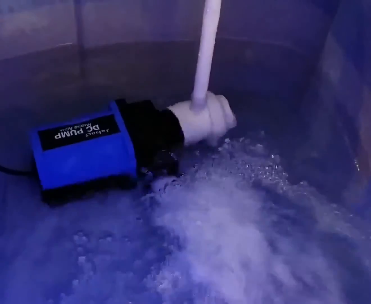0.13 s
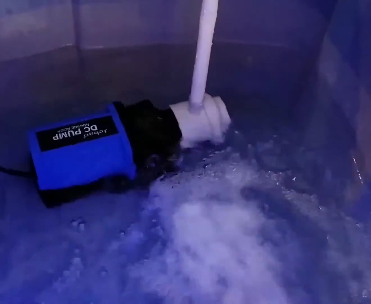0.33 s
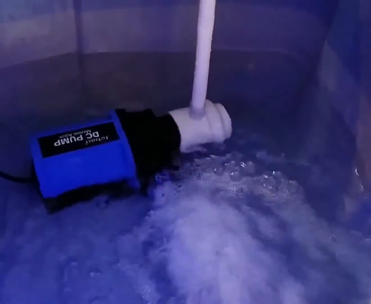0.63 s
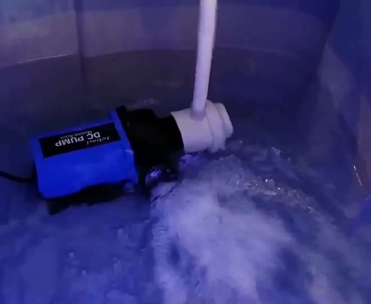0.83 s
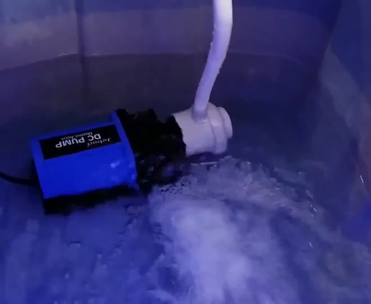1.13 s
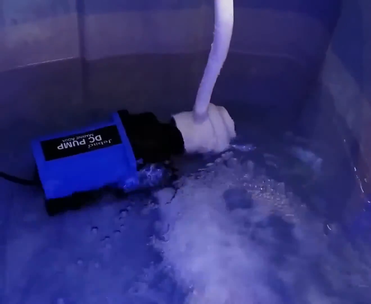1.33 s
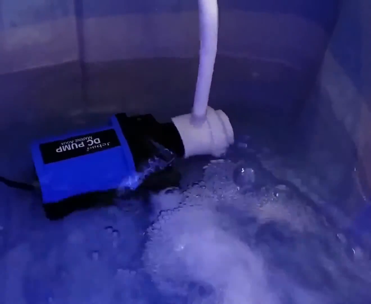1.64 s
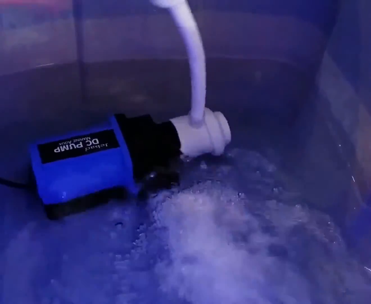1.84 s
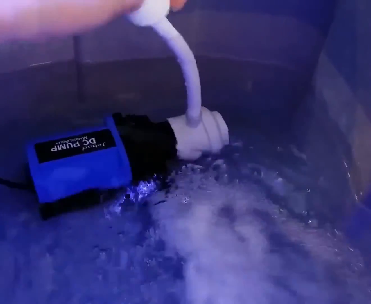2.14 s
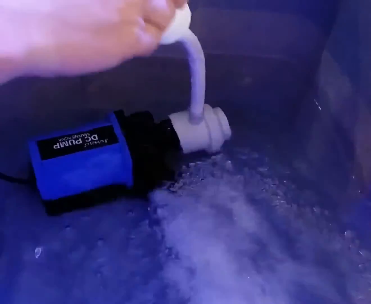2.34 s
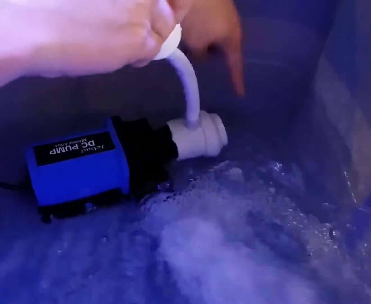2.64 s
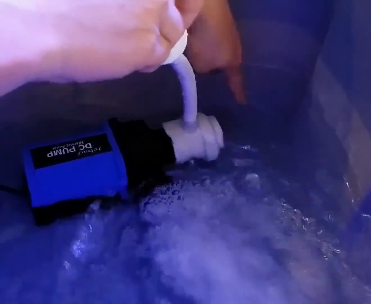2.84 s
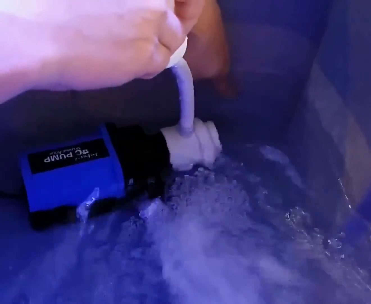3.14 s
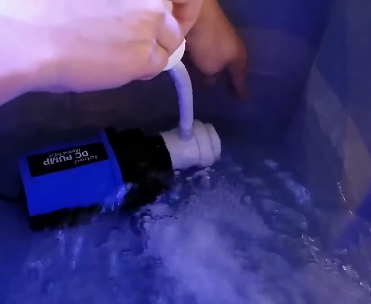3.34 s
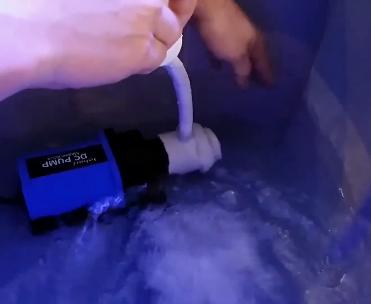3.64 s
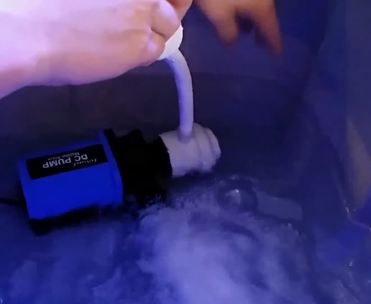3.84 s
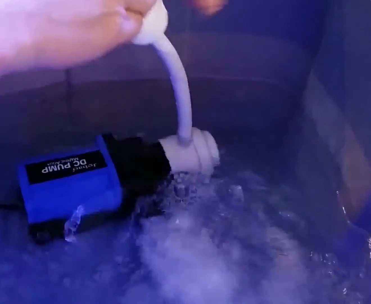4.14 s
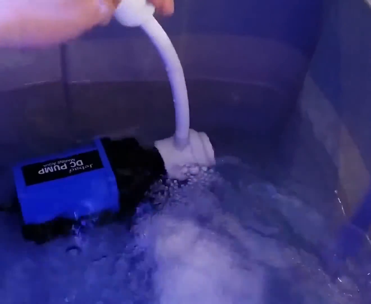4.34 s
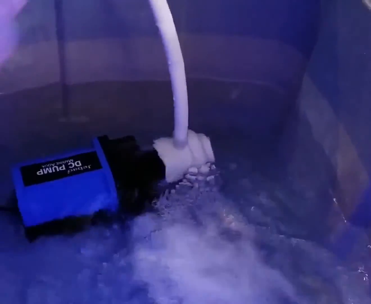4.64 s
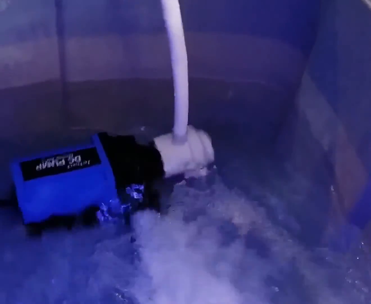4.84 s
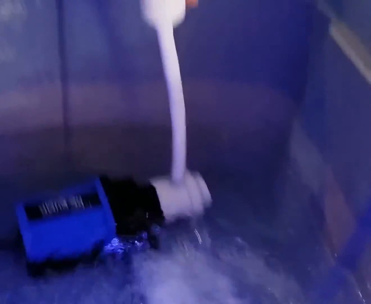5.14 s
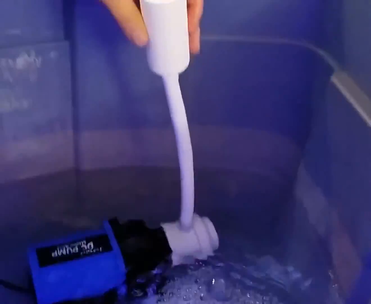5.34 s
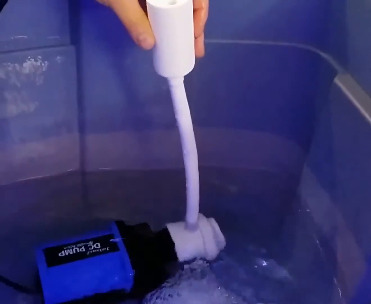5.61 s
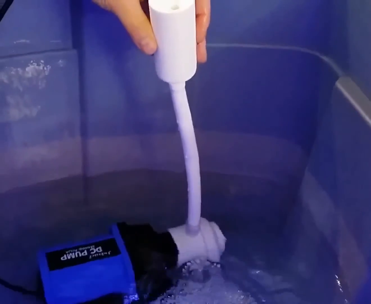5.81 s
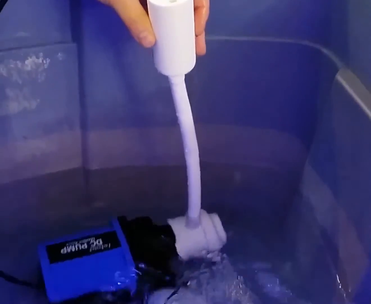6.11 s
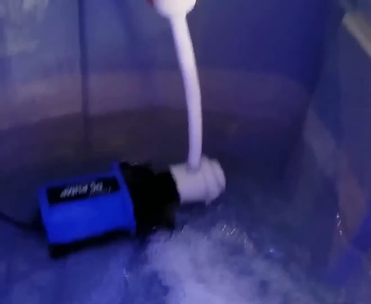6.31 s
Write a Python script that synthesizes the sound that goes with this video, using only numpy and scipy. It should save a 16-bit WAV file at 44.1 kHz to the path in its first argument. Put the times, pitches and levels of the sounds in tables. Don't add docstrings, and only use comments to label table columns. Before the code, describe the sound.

Close above a plastic tub, a submerged pump beats air into water: a steady low boom, soft foam fizz and a faint breathy whistle. For nearly two seconds water spits up the air hose in bright, hollow ticks. It then calms to small snaps and lone bubble blips until the sputtering returns around 4.6 seconds, ending in deeper, wetter glugs.

```python
import sys
import numpy as np
from scipy import signal
from scipy.fft import rfft, irfft
from scipy.io import wavfile
from scipy.ndimage import uniform_filter1d

SR = 44100
rng = np.random.default_rng(int(sys.argv[2]) if len(sys.argv) > 2 else 0)


def linear_from_db(decibels):
    return 10 ** (np.asarray(decibels, float) / 20)


def pcm_store(signal):
    levels = np.round(np.clip(np.atleast_2d(signal), -1, 1) * 32767)
    wavfile.write(sys.argv[1], SR, levels.astype(np.int16).T)


N = 285229

# start t/s, length/s, spray level/dB, depth of its air pockets/dB
GULP_TIMES = [(-.002, 0.051, -31, -9), (0.066, 0.073, -36.5, -8), (0.175, 0.1, -41.5, 1.5),
              (0.283, 0.078, -33, -6.5), (0.418, 0.04, -30, -7), (0.558, 0.13, -37, -4),
              (0.773, 0.064, -35.5, -8), (0.99, 0.031, -32, -9), (1.15, 0.12, -35.5, -10),
              (1.26, 0.023, -29.5, -4.5), (1.323, 0.038, -34.5, 1.5), (1.358, 0.17, -32, -7.5),
              (1.714, 0.017, -32.5, -10), (1.743, 0.0092, -25, -17), (1.767, 0.035, -25, -6.5),
              (1.865, 0.01, -29.5, -3.5), (3.599, 0.045, -35.5, -6), (4.585, 0.054, -33.5, -2),
              (4.783, 0.034, -26, -7), (4.86, 0.024, -29.5, -12.5), (4.921, 0.029, -29, -3.5),
              (5.059, 0.046, -40.5, -11), (5.1, 0.14, -27.5, -6), (5.247, 0.21, -40, 1.5),
              (5.723, 0.08, -36.5, -1.5), (5.923, 0.019, -44, 4.5), (6.04, 0.11, -29, -0.5),
              (6.186, 0.079, -31.5, -0.5), (6.264, 0.055, -28, 0.5), (6.336, 0.11, -37, -1)]
LEFT_LAG = 18
SECOND_MODE = 1.93


def evened(x):
    return x / np.sqrt(np.mean(x ** 2) + 1e-20)


def curve(rows, axis):
    rows = np.array(rows)
    return np.interp(np.arange(N) / SR, rows[:, 0], rows[:, axis])


def read(points, hz):
    f, value = np.transpose(points)
    return np.interp(np.log(hz + 1), np.log(f + 1), value)


def lowpass(x, taps, hz):
    return signal.oaconvolve(x, signal.firwin(taps, hz, fs=SR)[None], "same")


def bandpass(x, low_hz, high_hz):
    return signal.sosfilt(signal.butter(2, [low_hz, high_hz], "band", fs=SR, output="sos"), x)


def both_ports(x):
    return np.array([np.roll(x, LEFT_LAG), x])


def ring(t, hz, t60, rise=0.00024):
    return np.sin(2 * np.pi * hz * t) * (1 - np.exp(-t / rise)) * linear_from_db(-60 * t / t60)


def narrow_noise(hz, width_hz):
    real, imaginary = rng.standard_normal((2, len(hz)))
    wobble_filter = signal.butter(2, width_hz / 2, fs=SR, output="sos")
    wobble = signal.sosfilt(wobble_filter, real + 1j * imaginary)
    return evened((wobble * np.exp(2j * np.pi * np.cumsum(hz) / SR)).real)


def noise(colour, size, patchy_db, flicker_db):
    # f/Hz, likeness (0 to 1)
    likeness = [(30, .9), (60, .97), (130, .995), (290, .99), (640, .76), (1410, .35), (3100, .05),
                (15000, 0)]
    frames, hz = 4 * N // size + 5, np.fft.rfftfreq(size, 1 / SR)
    a, b, c, d, patches = rng.standard_normal((frames, len(hz), 5)).T
    patches = uniform_filter1d(patches, size=4, axis=0)
    patches = evened(uniform_filter1d(patches, size=6, axis=1))
    flicker = evened(uniform_filter1d(rng.standard_normal(frames), size=3))
    same = np.clip(read(likeness, hz), -1, 1)[:, None]
    left = a + 1j * b
    right = same * left + np.sqrt(1 - same ** 2) * (c + 1j * d)
    level_db = colour(hz)[:, None] + patchy_db * patches + flicker_db * flicker
    spectra = np.array([left, right]) * linear_from_db(level_db)
    return evened(signal.istft(spectra, nperseg=size, noverlap=3 * size // 4)[1][:, :N])


def sputters():
    rows, t, out = breaks(), np.arange(700) / SR, np.zeros((2, N + 800))
    cracks = rng.standard_normal((len(rows), 3, len(t)))
    cracks = cracks[:, :2] + 0.22 * cracks[:, 2:]
    bright = bandpass(cracks, 4900, 9300)
    broad = bandpass(cracks, 1600, 5500)
    crack_shape = (1 - np.exp(-t / 0.00049)) * linear_from_db(-60 * t / 0.0026)
    for (s, db, low_hz, low_db, high_hz, crack_db), top, body in zip(rows, bright, broad):
        low_ring = linear_from_db(low_db - 1.5) * ring(t, low_hz, 0.011, rise=0.00036)
        high_ring = 0.81 * ring(t, high_hz, 0.0067)
        crack = (linear_from_db(crack_db + 23) * top + 0.5 * body) * crack_shape
        tick = low_ring + high_ring + crack
        for side, lag in enumerate((LEFT_LAG, 0)):
            at = round(s * SR) + lag
            out[side, at:at + len(t)] += linear_from_db(db + 5) * tick[side]
    return out[:, :N]


def breaks():
    # t/s, peak level/dB, ring f/Hz, crack share/dB
    slugs = [(0.0663, -13.5, 5440, -10), (.267, -20, 8100, -4), (0.301, -15.5, 4260, -5.5),
             (.4238, -21.5, 5400, -19), (.441, -20, 6050, -8.5), (0.4545, -15.5, 4000, -28),
             (.612, -16.5, 3370, -18), (0.6274, -24, 4900, -14), (0.9926, -19.5, 5130, -15),
             (1.0137, -17, 4140, -21), (1.1558, -23, 3480, -4.5), (1.1672, -7.5, 4320, -19),
             (1.2035, -14, 3900, -12.5), (1.263, -9, 3580, -19), (1.378, -13, 8000, -9),
             (1.7424, -10, 3540, -13), (1.7753, -12.5, 3450, -10.5), (1.8554, -12, 3530, -23),
             (2.176, -25, 5020, -4.5), (3.689, -16.5, 7700, -23), (4.591, -21.5, 4400, -2),
             (4.783, -24, 5100, -2), (4.856, -12.5, 4300, -11), (4.866, -12.5, 4200, -20),
             (4.927, -14, 4130, -18), (5.119, -12, 3850, -11), (5.1445, -16.5, 3830, -6),
             (5.1898, -10.5, 6480, -13.5), (6.038, -19, 5030, -13), (6.2654, -14, 4170, -4)]
    # t/s, peak level/dB, pocket f/Hz, second ring/dB
    glugs = [(0.067, -24, 2930, -20), (0.559, -29, 2200, 3), (0.585, -22, 2320, -18),
             (1.1558, -10, 3330, -5), (1.3137, -22, 1740, 3), (1.3642, -17, 3170, -7),
             (1.378, -21, 3210, -10), (4.283, -22, 1880, -3), (4.637, -23, 2540, -16),
             (4.783, -22.5, 2610, -5), (4.865, -21, 1790, -18), (4.9283, -22, 2760, -1),
             (5.0634, -21, 2950, -5), (5.089, -18.5, 2630, 1.5), (5.1057, -21.5, 2300, -2),
             (5.189, -19, 2260, -13), (5.2095, -16.5, 3080, -1), (5.309, -33, 2200, -7),
             (5.9304, -19.5, 2640, -16), (6.049, -20.5, 2030, 8), (6.0651, -11, 1940, -0.5),
             (6.1024, -17.5, 1900, 6), (6.127, -18.5, 1940, 7.5), (6.1839, -19.5, 2080, 13),
             (6.2289, -17.5, 2010, 7.5), (6.247, -16, 1860, 3), (6.278, -17, 2360, -4),
             (6.3159, -8.5, 1740, -6), (6.341, -18, 1740, -11), (6.39, -20, 1810, 3)]
    # t/s, peak level/dB, f/Hz
    drips = [(0.0609, -35, 2620), (0.2721, -27, 2070), (0.2996, -23, 2620), (0.3051, -25, 2330),
             (0.6262, -24, 2430), (1.1834, -21, 3240), (1.2063, -34, 2240), (1.2622, -28, 3300),
             (1.3445, -21, 2560), (1.3561, -21, 1930), (1.3888, -30, 3190), (1.4244, -38, 3190),
             (1.7433, -24.0, 3280), (1.7487, -22, 2600), (1.7538, -34, 3270), (1.7748, -21.7, 3270),
             (1.7835, -31, 3300), (1.7962, -26, 2240), (1.8035, -31, 3300), (1.8546, -30, 3220),
             (1.8655, -34, 3250), (4.8072, -28, 2330), (4.8126, -28.2, 2220), (4.8558, -23.5, 1985),
             (4.936, -22, 2720), (5.0702, -22, 2580), (5.0924, -23, 2600), (5.1112, -34, 2430),
             (5.1181, -21.8, 2240), (5.1239, -22.0, 2400), (5.1297, -23, 2300), (5.1359, -23, 2400),
             (5.1446, -25, 2180), (5.1501, -30, 2130), (5.1562, -22, 2300), (5.1682, -21, 2240),
             (5.1816, -19, 2250), (5.2038, -20, 2370), (5.2132, -20, 2070), (5.219, -33, 2240),
             (5.2237, -28.2, 2150), (5.2375, -29.3, 2420), (5.3133, -29.3, 2330), (6.0379, -27, 2820),
             (6.0426, -24, 2320), (6.0992, -17, 1810), (6.1162, -17, 1810), (6.1398, -35, 2150),
             (6.1721, -25, 2150), (6.1884, -17.5, 2290), (6.1997, -20, 2410), (6.2146, -22, 2350),
             (6.2396, -26.8, 2280), (6.2646, -26.5, 2170), (6.2708, -21, 2220), (6.2839, -15.5, 1810),
             (6.3024, -22, 2780), (6.3071, -19, 2580), (6.3248, -33, 2330), (6.3782, -25, 1810)]
    # t/s, peak level/dB, f/Hz
    spits = [(0.0007, -23, 4420), (0.0177, -30.8, 4200), (0.124, -34, 3360), (0.3044, -32, 4310),
             (0.3116, -33, 4050), (0.468, -35, 6460), (0.6421, -23, 4800), (0.8137, -26, 4330),
             (0.8685, -24, 3940), (1.1537, -22, 4390), (1.1827, -16, 4220), (1.1907, -19, 4250),
             (1.2117, -26, 5600), (1.276, -28, 3550), (1.3159, -33, 3340), (1.3634, -22, 5080),
             (1.3892, -32, 3360), (1.4022, -36, 3940), (1.4244, -23, 3360), (1.72, -38, 5770),
             (1.7338, -20, 6290), (1.7538, -25, 3530), (1.7607, -25, 7920), (1.7835, -15, 3500),
             (1.7922, -16, 3560), (1.8031, -17, 3700), (1.8107, -28.3, 3700), (1.8536, -28, 4600),
             (1.8655, -33, 3530), (4.5968, -22, 4270), (4.7873, -24, 6890), (4.7949, -23, 5320),
             (4.8076, -28, 4130), (4.87, -29.9, 7900), (4.8761, -30, 4340), (4.936, -19, 5230),
             (4.9422, -29.1, 3960), (5.0623, -29.9, 4870), (5.1297, -18, 8440), (5.1599, -21, 3720),
             (5.1747, -28, 3620), (5.1805, -26, 5170), (5.1885, -30, 4650), (5.2107, -25, 3360),
             (6.0564, -30.4, 3700), (6.0651, -24.3, 3960), (6.0767, -28, 3790), (6.1155, -26.8, 3930),
             (6.1318, -24, 4570), (6.167, -29, 3880), (6.1942, -32, 3880), (6.2022, -30.0, 4740),
             (6.2247, -24, 5200), (6.2392, -28.7, 3880), (6.2577, -25.1, 3790), (6.2835, -21, 3960),
             (6.3016, -28.0, 4800), (6.3158, -20, 3560), (6.343, -35, 3530), (6.3905, -20, 3450)]
    long_hz = 2420
    rows = [(s, db, long_hz, -33.5, hz, crack_db) for s, db, hz, crack_db in slugs]
    rows += [(s, db + second_db, hz, -second_db, SECOND_MODE * hz, -47) for s, db, hz, second_db in glugs]
    rows += [(s, db - 1.5 - 31, hz, 31, SECOND_MODE * hz, -20) for s, db, hz in drips]
    rows += [(s, db + 1.5, long_hz, -26, hz, -17.5) for s, db, hz in spits]
    return rows + strays()


def strays():
    rows, per_s = [], 75
    start_hz, end_hz, opens_s = 2830, 2200, 0.041
    for (s, length, db, depth_db), luck in zip(GULP_TIMES, rng.random((len(GULP_TIMES), 24, 5))):
        for k, (at, size, low, high, crack) in enumerate(luck[:int(per_s * length)]):
            u = (k + 0.5 + 0.9 * at) / per_s
            low_hz = end_hz + (start_hz - end_hz) * np.exp(-u / opens_s)
            low_hz = (low_hz - 19 * (depth_db + 9)) * (0.93 + 0.17 * low)
            high_hz = 3400 + 1300 * high ** 2.5
            crack_db = -17 - 14 * crack - 4.5 * (depth_db + 3)
            rows.append((s + u, db - 5 - 8 * size, low_hz, depth_db - 9.5, high_hz, crack_db))
    return rows


def gulps():
    t = np.arange(0, N + 16, 16) / SR
    power = np.full(len(t), linear_from_db(2 * -46))
    upright = np.clip((t - 5.4) / 0.23, 0, 1)
    deep = power * linear_from_db(2 * (-5 + 7 * upright))
    for s, length, db, depth_db in GULP_TIMES:
        u = t - s
        sag_db = -3 * np.clip(u / length, 0, 1)
        drain_db = -227 * np.maximum(u - length, 0)
        gulp = np.clip(u / 0.0021, 0, 1) ** 2 * linear_from_db(2 * (db + sag_db + drain_db))
        power = power + gulp
        deep = deep + gulp * linear_from_db(2 * depth_db)
    spurts = linear_from_db(3 * evened(uniform_filter1d(rng.standard_normal(len(t)), size=12)))
    strength, depth = np.sqrt(power) * spurts, np.sqrt(deep / power)
    return [np.interp(np.arange(N) / SR, t, x) for x in (strength, depth)]


def wash():
    # f/Hz, level/dB per Hz
    spray_colour = [(290, -43), (500, 0.5), (1230, -13), (1580, -7), (1900, -5), (2930, -4.5), (3860, 2.5),
                    (5970, -0.5), (7980, -2.5), (14900, -23), (16000, -39)]
    # f/Hz, level/dB
    pockets = [(620, -8), (1050, -29), (1450, -20), (1780, -10), (1950, -31), (2200, -6.5), (2350, 7.5),
               (2650, 6.5), (3150, -17), (3600, 13), (3950, -19), (4400, -30), (5000, 9)]
    spray, deep = gulps()
    deep = deep * linear_from_db(7)
    hiss = noise(lambda hz: read(spray_colour, hz), size=256, patchy_db=3, flicker_db=2)
    low = lowpass(hiss, 255, 2900)
    t, drops = np.arange(900) / SR, np.zeros(N)
    for hz, db in pockets:
        hits = rng.random(N) < 120 / SR
        sizes = linear_from_db(3 * np.minimum(rng.exponential(1, N), 2.5)) * hits
        rung = signal.oaconvolve(sizes, linear_from_db(db) * ring(t, hz, 32 / hz))[:N]
        drops += rung * (deep if hz < 2900 else 1)
    drops = evened(both_ports(drops))
    top = hiss - lowpass(hiss, 255, 5600)
    hiss = hiss - top + top / np.sqrt(1 + (0.27 * deep) ** 2)
    slosh = lowpass(hiss, 255, 1250)
    low = low - slosh
    hiss = hiss - slosh + 0.47 * deep ** 2 * slosh
    return spray * linear_from_db(-3) * (hiss - low + deep * low), spray * linear_from_db(-10) * drops


def gargles():
    # t/s, length/s, level/dB, start f/Hz, end f/Hz
    glides = [(0, 0.061, -43, 2800, 2594), (0.096, .04, -45, 2710, 2810), (5.35, .65, -49, 1716, 1755),
              (0.423, 0.07, -46, 2390, 2450), (0.561, 0.074, -46.5, 2230, 2355),
              (1.169, 0.047, -40.5, 2700, 2210), (1.236, 0.025, -47, 2410, 2480),
              (1.262, .035, -39, 3500, 3440), (1.366, 0.12, -42.5, 2050, 2213),
              (1.365, 0.072, -40, 3185, 3010), (3.825, .2, -47.5, 4080, 4010),
              (4.856, 0.012, -34, 1914, 1790), (5.12, 0.06, -39, 3820, 3760),
              (5.187, 0.095, -42, 6500, 6640), (5.291, 0.037, -41.5, 2250, 2244),
              (6.323, .14, -48, 1760, 1792)]
    out, edge_s = np.zeros(N + SR), 0.004
    for s, length, db, from_hz, to_hz in glides:
        t = np.arange(0, length + 4 * edge_s, 1 / SR)
        hz = from_hz + (to_hz - from_hz) * np.minimum(t / length, 1)
        shape = np.minimum(t / 0.0025, 1) * np.exp(-np.maximum(t - length, 0) / edge_s)
        out[round(max(s, 0) * SR):][:len(t)] += linear_from_db(db) * shape * narrow_noise(hz, 0.14 * from_hz)
    return both_ports(out)[:, :N]


def blips():
    # t/s, peak level/dB, f/Hz
    bubbles = [(.055, -24, 2780), (.12, -24, 3250), (.134, -19, 7340), (0.22, -37, 1900), (.267, -28, 1990),
               (1.19, -32, 2520), (1.5216, -26, 4080), (1.992, -24, 4200), (2.176, -30.5, 1810),
               (2.362, -37, 1910), (2.9922, -36, 1870), (3.4892, -33, 2400), (3.6193, -27, 4500),
               (3.7347, -25, 4020), (3.765, -34, 1940), (3.841, -24.5, 4410), (3.93, -27, 4060),
               (3.945, -22, 3830), (3.9731, -22, 3900), (4.0165, -26, 4100), (4.169, -21, 3760),
               (4.225, -31.5, 1890), (4.359, -22, 7000), (5.547, -33, 1660), (5.763, -33, 2520),
               (5.7867, -20, 3830), (5.796, -21, 3720), (5.805, -27.5, 2520), (5.873, -29, 2250),
               (6.2098, -10.5, 5080), (6.398, -15.5, 7300), (1.3638, -23, 1850), (5.2948, -29, 2100),
               (5.311, -16, 3960), (5.3285, -34, 4640), (5.727, -35, 2300), (5.725, -25.5, 3400),
               (5.756, -26, 3750), (5.79, -24, 4970), (5.931, -26, 4070), (6.4375, -27, 1770),
               (0.612, -22, 5100), (0.654, -27, 4700), (1.466, -28, 5200), (1.529, -32, 4100),
               (6.2767, -15, 4550)]
    t, out = np.arange(900) / SR, np.zeros(N + 900)
    for s, db, hz in bubbles:
        out[round(s * SR):][:len(t)] += linear_from_db(db + 7.5) * ring(t, hz, 26 / hz, rise=0.00055)
    return both_ports(out)[:, :N]


def plops():
    # t/s, peak level/dB, f/Hz
    big_bubbles = [
        (1.298, -13.5, 245),
        (3.61, -26.5, 780),
        (3.662, -29, 794),
        (4.755, -11.5, 264),
        (6.096, -9.5, 238),
    ]
    t, out = np.arange(2500) / SR, np.zeros(N + 2500)
    for s, db, hz in big_bubbles:
        out[round(s * SR):][:len(t)] += linear_from_db(db) * ring(t, hz * (1.06 + 2 * t), 0.041, rise=0.0012)
    return out[:N]


def snaps():
    # t/s, peak level/dB, f/Hz
    tiny_bubbles = [(0.0657, -47, 10100), (0.2663, -37, 8500), (0.2997, -31, 8660), (0.423, -34.5, 13400),
                    (0.5407, -43, 8900), (1.0917, -22, 10100), (1.1533, -28, 9810), (1.19, -33, 8900),
                    (1.231, -23, 11400), (1.279, -24, 11800), (1.3766, -32, 9100), (1.4641, -24, 8550),
                    (1.7424, -28, 8900), (1.7739, -27, 9680), (1.967, -24, 13200), (2.174, -23, 9100),
                    (2.4588, -29, 9900), (2.851, -30, 9900), (2.9506, -21, 9900), (3.3292, -24, 9600),
                    (3.7998, -27, 9200), (4.2892, -23, 9900), (4.5905, -15, 8500), (4.783, -42, 8500),
                    (4.854, -37, 9100), (5.1178, -31, 8560), (5.1891, -47, 8710), (5.6096, -28, 9180),
                    (6.037, -19, 8400), (6.2642, -31, 8840)]
    t, out = np.arange(900) / SR, np.zeros((2, N + 900))
    puffs = np.diff(rng.standard_normal((len(tiny_bubbles), 2, len(t) + 2)), n=2)
    puffs = puffs * linear_from_db(-60 * t / 0.014) * (1 - np.exp(-t / 0.0005))
    for (s, db, hz), puff in zip(tiny_bubbles, puffs):
        snap = 0.8 * ring(t, hz, 0.0066, rise=0.0002) + 0.23 * puff
        out[:, round(s * SR):][:, :len(t)] += linear_from_db(db) * snap
    return out[:, :N]


def boom():
    # t/s, level/dB
    churning = [(0, -25), (.25, -26.5), (.6, -27.5), (1.05, -27), (1.3, -26.5), (1.6, -27), (1.95, -23),
                (2.25, -29.5), (2.6, -25.5), (2.9, -28), (3.4, -26), (3.9, -23), (4.3, -24), (4.9, -26.5),
                (5.5, -25), (5.85, -29.5), (6.12, -22), (6.46, -29)]
    # f/Hz, level/dB per Hz
    boom_colour = [(15, -43), (35, -47), (50, -48), (62, -25.5), (90, -11.5), (110, -11.5), (125, -16.5),
                   (150, -4), (186, -1.5), (250, -4.5), (325, -1.5), (375, -7.5), (420, -19.5), (500, -23),
                   (700, -36), (1200, -55)]
    x = noise(lambda hz: read(boom_colour, hz), size=2048, patchy_db=0.7, flicker_db=1.7)
    deep = lowpass(x, 2047, 220)
    churn_db = curve(churning, axis=1)
    return linear_from_db(churn_db - 4) * evened(deep) + linear_from_db(churn_db - 3) * evened(x - deep)


def fizz():
    # f/Hz, level/dB per Hz
    foam_colour = [(260, -6), (450, -3), (620, -14), (860, -8.5), (1240, -13.5), (1600, -20), (2100, -18.5),
                   (3000, -12), (4000, -13.5), (4500, -12.5), (5200, -14.5), (9200, -15), (9800, -18.5),
                   (16000, -24.5)]
    hiss = noise(lambda hz: read(foam_colour, hz), size=512, patchy_db=2.5, flicker_db=0.73)
    t, pops = np.arange(300) / SR, np.zeros((2, N))
    for hz in np.geomspace(1500, 14500, 24):
        bursts = rng.random((2, N)) < 9 / SR
        sizes = linear_from_db(0.91 * np.minimum(rng.exponential(1, (2, N)), 4)) * bursts
        pop = ring(t, hz * (1 + 25 * t), 14 / hz) * linear_from_db(read(foam_colour, hz)) * np.sqrt(hz)
        pops += signal.oaconvolve(sizes, pop[None], axes=1)[:, :N]
    return linear_from_db(-44.5) * (linear_from_db(4) * hiss + linear_from_db(-5) * evened(pops))


def tones():
    # f/Hz, width/Hz, level/dB
    resonances = [(571, 11, -62.5), (897, 90, -62), (1071, 22, -63.5), (1112, 19, -60.5), (1442, 58, -62),
                  (1810, 95, -59), (1940, 90, -58.5), (4100, 1060, -50)]
    # t/s, level/dB
    draw = [
        (0, -46),
        (.4, -49),
        (2.0, -45),
        (2.8, -50),
        (3.5, -46.5),
        (4.15, -43.5),
        (5.8, -49.5),
        (6.4, -42.5),
    ]

    def colour(hz):
        peaks = [linear_from_db(2 * db) / w / (1 + (2 * (hz - f) / w) ** 4) for f, w, db in resonances]
        return 10 * np.log10(sum(peaks))

    return linear_from_db(curve(draw, axis=1)) * noise(colour, size=2048, patchy_db=1.5, flicker_db=0.5)


def whistle():
    # t/s, f/Hz, level/dB
    wavering = [
        (0, 900, -63),
        (1.5, 895, -63.5),
        (1.82, 892, -49.5),
        (2.3, 900, -62),
        (3.4, 885, -64),
        (3.6, 850, -56),
        (3.85, 897, -50),
        (4.5, 908, -55),
        (5.1, 905, -65),
        (6.46, 895, -56),
    ]
    t, width_hz = np.arange(N) / SR, 21
    tone = linear_from_db(curve(wavering, axis=2)) * narrow_noise(curve(wavering, axis=1), width_hz)
    hum_db = -53 - 12.4 * np.clip((t / 1.1) ** 4, 0, 1)
    return tone + linear_from_db(hum_db) * narrow_noise(np.full(N, 564), width_hz)


def tub(x):
    # f/Hz, t60/s
    decay = [(1000, 0.08), (3000, 0.076), (8000, 0.048), (15000, 0.017)]
    taps = np.zeros((2, 8000))
    at = np.arange(80, 7980, 20) + rng.integers(0, 20, (2, 395))
    np.put_along_axis(taps, at, rng.choice([-1., 1.], at.shape), 1)
    hz, t, z = signal.stft(taps, SR, nperseg=128)
    fade = linear_from_db(-60 * t / read(decay, hz)[:, None])
    tail = signal.istft(z * fade, SR, nperseg=128)[1]
    return signal.fftconvolve(x, tail / np.linalg.norm(tail[0]), axes=1)[:, :N]


def scene():
    hiss, drops = wash()
    ticks = sputters() + drops + gargles() + blips() + plops() + snaps()
    return ticks + hiss + linear_from_db(-5.5) * tub(ticks) + boom() + fizz() + tones() + whistle()


def top_cut(x):
    return signal.sosfilt(signal.butter(12, 16850, fs=SR, output="sos"), x)


def record(dry):
    # f/Hz, level/dB
    lean = [(300, -3.5), (600, -2), (1200, -4), (2500, -4), (4500, -2.5), (8500, -2), (13000, -5.5)]
    hz = np.fft.rfftfreq(N, 1 / SR)
    ports = linear_from_db(read(lean, hz) * np.array([[0.5], [-0.5]]))
    ports = ports / (1 + (hz / 15950) ** 400)
    return top_cut(irfft(rfft(dry) * ports, N))


dry = scene()
out = record(dry)
pcm_store(out)
```